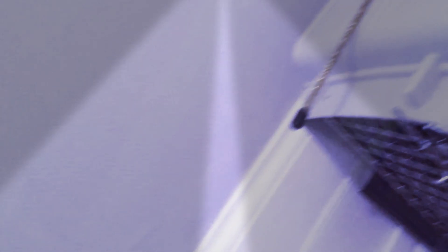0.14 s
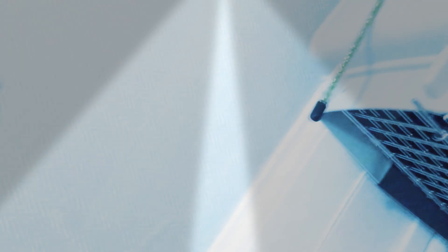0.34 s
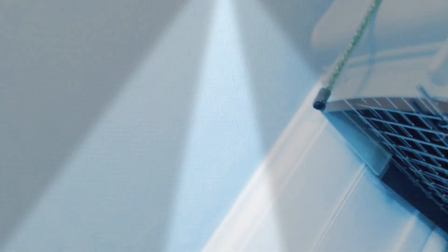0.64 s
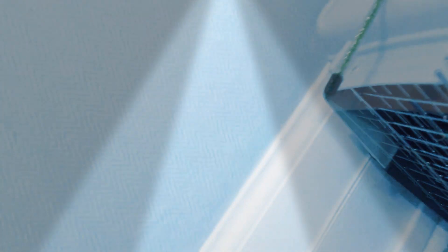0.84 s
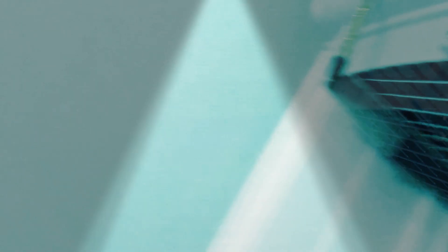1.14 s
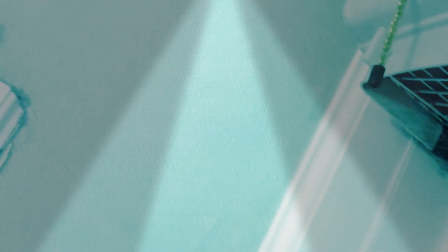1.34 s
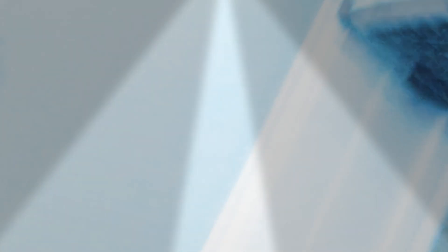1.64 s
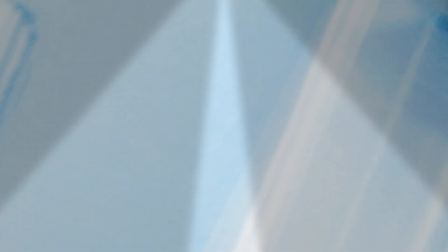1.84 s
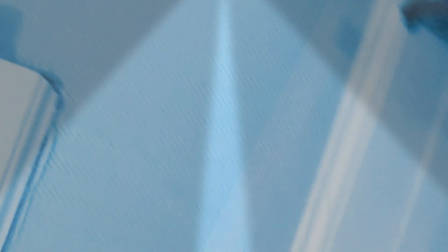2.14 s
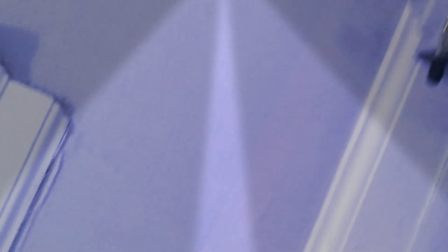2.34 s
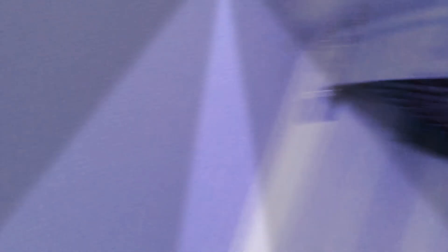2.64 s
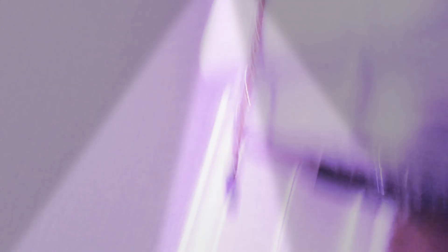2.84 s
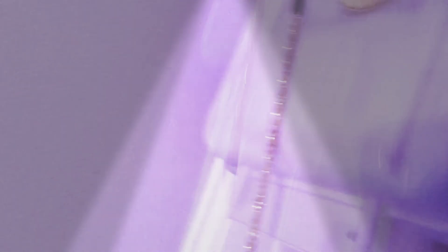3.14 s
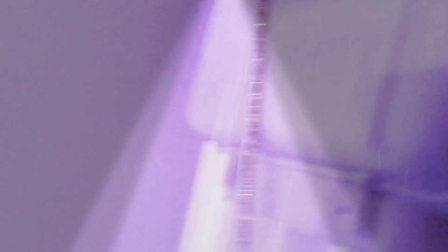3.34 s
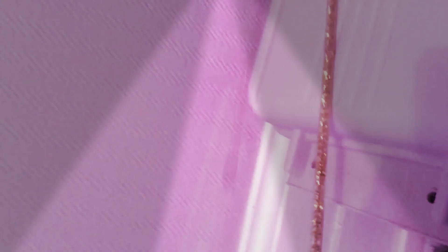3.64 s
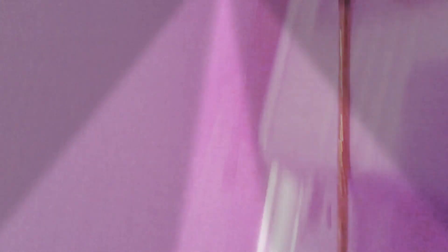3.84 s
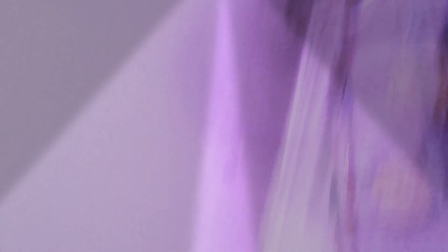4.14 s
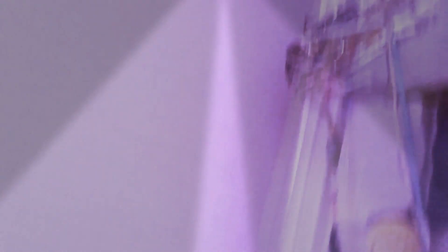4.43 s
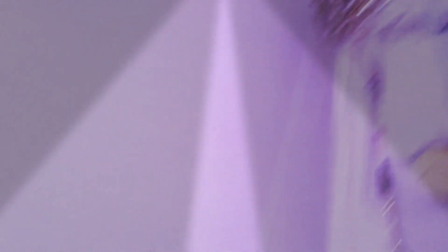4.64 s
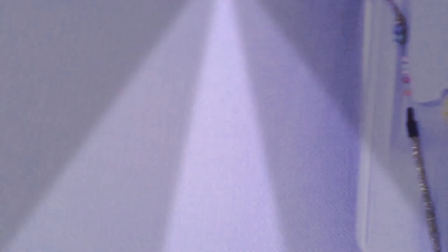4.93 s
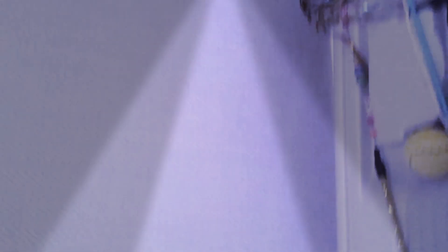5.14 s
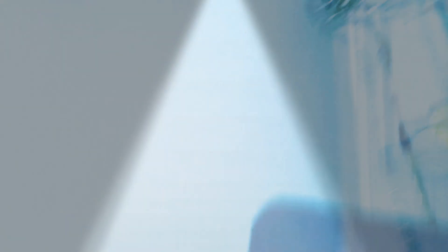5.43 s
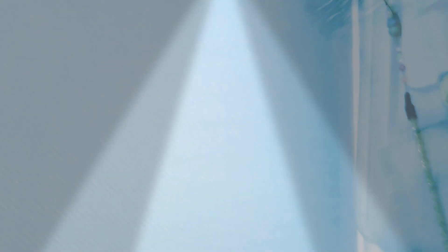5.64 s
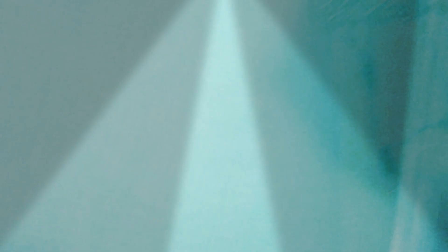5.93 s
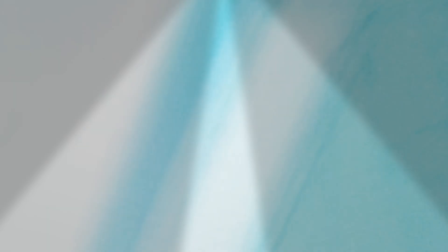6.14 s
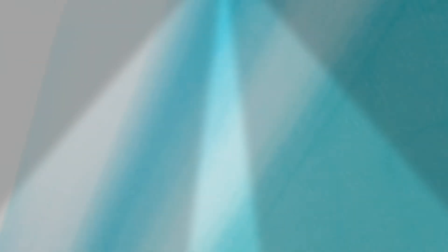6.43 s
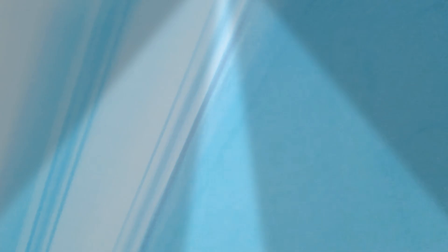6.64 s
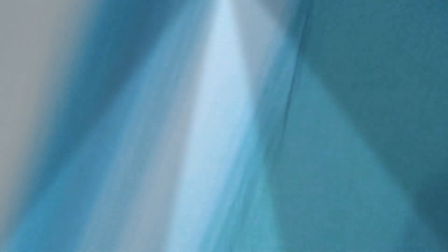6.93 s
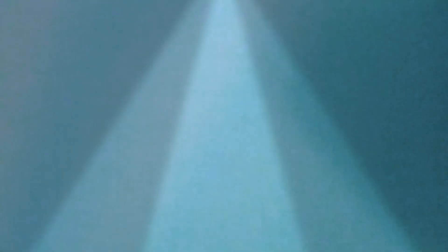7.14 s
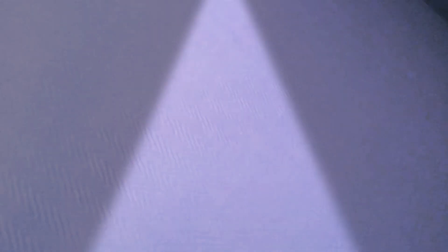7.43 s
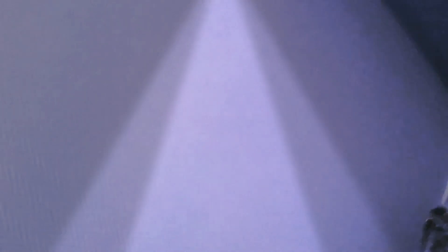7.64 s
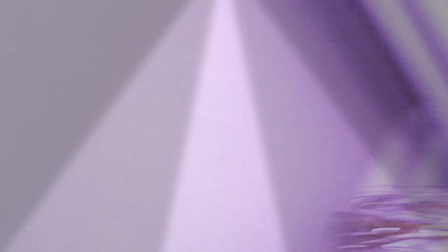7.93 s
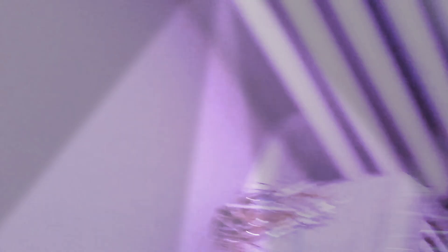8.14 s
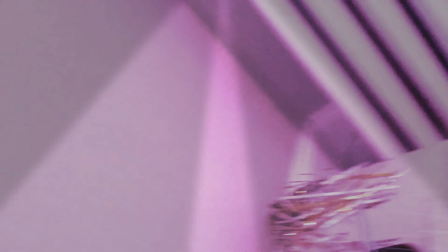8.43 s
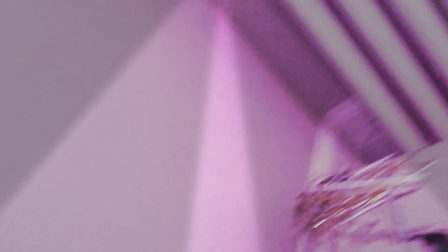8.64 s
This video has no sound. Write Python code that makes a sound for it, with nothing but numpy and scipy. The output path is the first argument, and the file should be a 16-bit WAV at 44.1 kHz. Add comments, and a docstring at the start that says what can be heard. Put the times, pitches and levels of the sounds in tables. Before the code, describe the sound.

Soft hollow knocks and ticks on plastic come close by, amid the scratching and rustling of a small animal moving about.

```python
"""A bare room, hand-held microphone close to some hard plastic things with something light moving among them.
Hollow knocks ring the modes of the plastic and the room answers; small edges tick. Sliding surfaces
rustle, scratch and now and then squeak, with a faint high tone and a fine crackle early on.
Soft bumps reach the microphone through its case, over a low room rumble and a thin hiss."""
import sys
import numpy as np
from scipy import signal
from scipy.fft import rfft, irfft, next_fast_len
from scipy.io import wavfile
from scipy.ndimage import uniform_filter1d, map_coordinates

SR = 44100
rng = np.random.default_rng(int(sys.argv[2]) if len(sys.argv) > 2 else 0)


def unload_wav(signal):
    """Save mono or channel-first audio to the path in sys.argv[1] as 16-bit WAV at rate SR, clipped to [-1, 1]."""
    wavfile.write(
        sys.argv[1],
        SR,
        np.round(np.clip(np.atleast_2d(signal).T, -1, 1) * 32767).astype(np.int16),
    )


N = 386757

# Noise spectra of the background, the room wash and the sliding surfaces: frequency_hz, level_db
RUMBLE_SPECTRUM = [(13, -60), (22, -26), (54, 6), (87, -0.5), (126, -5), (177, -10.5), (400, -23),
                   (520, -106), (880, -120)]
HISS_SPECTRUM = [(150, -42), (250, -4.5), (373, -15), (407, -31), (640, -41), (1100, -35), (7060, -24.5),
                 (8400, -20.5), (14200, -32.5), (16000, -45)]
WASH_SPECTRUM = [(120, -34), (200, -6), (329, 3), (445, 4), (545, -2), (863, -10), (1800, -14), (2340, -43),
                 (3960, -120)]
SCRAPE_SPECTRUM = [(710, -6.5), (1200, -13.5), (1630, -8.5), (1880, -7.5), (2340, -0.5), (2740, -2.5),
                   (2960, -6.5), (5000, -16.5), (6500, -16), (11000, -120)]
SWISH_SPECTRUM = [(2470, -3), (4200, -1), (4830, -23), (5490, 0.5), (6540, -3.5), (7190, -1.5),
                  (8170, -1.5), (9140, 0.5), (10800, -10), (15100, -35), (16000, -4)]
# Decay of the bare room: frequency_hz, t60_s
ROOM_DECAY = [(120, 0.66), (400, 0.33), (1000, 0.72), (3000, 0.49), (8000, 0.34)]
# Bumps through the microphone case: start_s, peak_db, pitch_hz
CASE_BUMPS = [(2, -44, 117), (3.486, -49, 115), (4.097, -53, 178), (4.639, -44.5, 151), (5.051, -44, 118),
              (5.905, -50, 72), (6.202, -42, 112), (7.067, -42, 131), (7.354, -43, 69.6), (7.461, -42, 154),
              (7.497, -38, 55.6), (7.53, -42, 55), (8.424, -30.5, 98), (8.608, -34, 107)]
# Course of the fine crackle: time_s, level_db
CRACKLE_LEVELS = [(0.3, -90), (0.45, -84), (1.4, -69), (1.78, -70), (1.95, -90)]
# Course of the faint high tone: time_s, pitch_hz, level_db
WHISTLE_PATH = [(0.002, 5470, -72), (0.144, 5400, -74), (0.22, 5320, -92)]
# Thin unsteady squeaks: start_s, length_s, first_hz, last_hz, level_db, waver_share
SQUEAK_GLIDES = [(1.024, 0.11, 2870, 2960, -65.5, 0.015), (1.13, 0.21, 2600, 2760, -61, 0.0154),
                 (2.878, 0.19, 3160, 2390, -62, 0.025), (5.608, .27, 2686, 2520, -56, 0.017),
                 (8.692, 0.076, 2610, 2530, -56.5, 0.029)]
# Very short clean chirps: start_s, length_s, first_hz, last_hz, level_db
CHIRP_GLIDES = [(1.612, 0.022, 6700, 6750, -61), (4.575, 0.02, 6800, 6850, -59),
                (4.615, 0.026, 9650, 9000, -64), (5.053, 0.035, 6630, 6280, -56.5)]
# Course of the sliding: time_s, scrape_db, swish_db
SLIDE_LEVELS = [(0.0, -73.5, -66.5), (0.3, -72.5, -83), (0.5, -74, -64), (0.85, -60.5, -68.5),
                (1.29, -58, -60.5), (1.83, -62, -61), (2.27, -65.5, -67), (2.39, -78, -95),
                (2.66, -70, -70), (2.86, -59, -60.5), (3.05, -65, -77), (3.3, -62.5, -71), (3.55, -70, -81),
                (4.15, -58.5, -66.5), (4.59, -68, -65.5), (5.03, -58, -59.5), (5.3, -68.5, -72),
                (5.81, -62.5, -68), (6.28, -67, -81), (7.17, -66.5, -72), (7.38, -63, -64),
                (8.2, -71.5, -67.5), (8.32, -67, -75), (8.77, -62.5, -67.5)]
# Single scratching strokes, and one dry snap on the case at 8.421 s: start_s, rise_s, t60_s, level_db,
# centre_hz, width_hz
STROKES = [(0.335, .006, 0.33, -60, 3270, 2000), (0.334, 0.0041, 0.091, -57.5, 8200, 2520),
           (0.448, 0.035, 0.49, -62, 3040, 1500), (1.134, 0.0032, 0.16, -52, 3300, 990),
           (2.708, 0.076, 0.93, -57.5, 5800, 1610), (3.749, 0.016, 0.057, -56.5, 2530, 1200),
           (3.852, 0.014, 0.34, -57.5, 2200, 2500), (4.385, 0.024, 0.74, -53, 2440, 1780),
           (4.55, 0.07, 2.7, -63, 8940, 1600), (4.581, 0.21, 2.4, -63.5, 6300, 1300),
           (5.62, 0.13, 0.45, -68.5, 5970, 1410), (7.201, 0.038, 0.99, -54.5, 2560, 1320),
           (7.723, 0.0044, 0.47, -48, 3030, 2600), (7.712, 0.038, 0.28, -59.5, 8100, 3000),
           (8.421, 0.0018, 0.0091, -39.5, 724, 2220), (8.501, 0.0035, 0.62, -58, 4930, 6240)]
# Small edges touching: start_s, peak_db, pitch_hz, treble_db (against the mode at pitch_hz)
EDGE_TICKS = [(0.317, -48, 2800, -3), (0.3691, -42, 3030, 10), (0.462, -44, 2480, 2),
              (0.4817, -58, 3340, 0), (0.508, -42.5, 3040, -7), (0.529, -46, 2800, -7),
              (0.547, -41, 2900, -1), (0.598, -46, 2670, 1), (0.755, -52, 2700, -9), (1.022, -43, 2660, -6),
              (1.1355, -33, 3480, -11), (1.165, -44, 2780, -19), (1.499, -39, 1900, -26),
              (1.553, -59, 3500, 6), (1.759, -45.5, 3480, 1), (1.851, -45, 3750, -1),
              (2.0927, -40, 3540, -1), (2.1797, -35, 2420, 3), (3.658, -46.5, 2500, -2.5),
              (3.847, -47, 2280, -18), (3.863, -35, 1560, -15), (3.882, -41, 2130, -7),
              (3.918, -40.5, 1610, -17), (3.966, -52, 2120, -23), (3.98, -47.5, 2250, 5),
              (4.929, -45, 3600, -8), (5.264, -49, 2700, -8.5), (5.285, -48, 2170, -20),
              (5.414, -49, 2500, -30), (6.1156, -48, 2440, -10), (6.797, -46, 2400, -11),
              (6.955, -56, 2360, -19.5), (7.08, -49, 3330, -3), (7.297, -42, 2900, -12),
              (7.547, -52, 2500, 2), (7.705, -44, 2920, -12), (7.723, -38, 2870, -16),
              (8.188, -49, 6600, 8), (8.4, -48, 2350, 0), (8.4935, -33.5, 2350, 2.5),
              (8.5013, -28, 3310, 4)]
# Hollow modes of the plastic in three groups, deep, middle and upper: frequency_hz, width_hz, level_db
HOLLOW_MODES = [
    [(334, 60, -1), (409.7, 33, 0)],
    [(550, 55, 1.5), (626.5, 33, -1.5), (711, 70, -1)],
    [(900.6, 82, 2.5), (1243, 237, -3)],
]
# Stiff modes and thin-edge modes of the plastic: frequency_hz, width_hz, level_db
STIFF_MODES = [(1370, 130, 8), (1610, 120, 1), (1924, 120, 4.5), (2270, 140, 4), (2553, 143, 4.5),
               (3030, 210, 4.5), (3820, 440, -3.5)]
THIN_EDGE_MODES = [(5400, 4400, 10.5), (7870, 940, 3), (9100, 3500, 11), (15500, 1300, -17)]
# Low modes of a thud: pitch_multiple, width_hz, level_db
THUD_MODES = [(1, 34, 4), (1.5, 47, -10)]
# Blows on the plastic: start_s, level_db (peak of the deep modes; the other levels are relative to it),
# thud_db, middle_db, hardness_db, snap_db, room_db, thud_hz, stiff_hz (where stiff modes are favoured)
BLOWS = [(0.28, -44, -10, -18, -20.5, -19.5, -6.5, 192, 2840),
         (0.66, -51, -19, -2.5, -41, -36, -3, 178, 2240),
         (0.734, -41.5, -14, -16.5, -13.5, -20.5, -2.5, 181, 2110),
         (1.34, -40, 2.5, -9, -8.5, -19, -2, 137, 3100),
         (1.471, -33, -6.5, -5, -10, -20.5, -5.5, 178, 2300),
         (2.046, -45.5, 4.5, -16, -19, -27, 3, 116.5, 2790),
         (2.11, -32.5, -20, -12, -10, -24, -5, 244, 2260),
         (2.679, -39, -10.5, -14.5, -9.5, -20.5, -5, 167, 1940),
         (3.222, -54, 0.5, -6, -8, -19, -12, 115, 2360), (3.8, -65, -4, 9, 0, -26, -5, 151, 1090),
         (3.848, -43, -14, -17, -13, -28, 2.5, 110, 1620), (3.9, -52.5, -28, -18, 3.5, -27, -14, 150, 1770),
         (4.339, -55, -24, -7, -12, -28, -19, 150, 2010), (4.842, -56, -21, -15, -9, -27, 6, 150, 1920),
         (4.928, -34, -15.5, -15, -12.5, -25, 1, 132, 2000),
         (5.253, -46, 5, -12.5, -16, -21.5, -2, 180.5, 2270),
         (5.949, -54.5, -2.5, -5.5, -6.5, -26, 2, 102, 1700),
         (6.53, -25, -16.5, -10.5, -4.5, -24.5, -1.5, 150, 3020),
         (6.704, -35, -9, -15, -19.5, -25, -5, 252, 2300), (7.137, -49, -9, -16, -8, -22, 2.5, 185, 2060),
         (7.6, -53, -1, -7, -9.5, -29, -2, 91.5, 2050), (8.132, -53.5, -1, -18, -15.5, -15, -3, 94, 2390)]


def amp(db):
    """Gain of a level in dB."""
    return 10 ** (np.asarray(db) / 20)


def unit(x):
    """x at rms 1."""
    return x / np.sqrt(np.mean(x ** 2) + 1e-20)


def unit_attack(x):
    """x at rms 1 over its first 15 ms."""
    return x / np.sqrt(np.mean(x[:SR * 15 // 1000] ** 2))


def along(points, hz):
    """Reads (frequency_hz, value) points at hz, on a log frequency axis."""
    point_hz, values = np.transpose(points)
    return np.interp(np.log(hz + 1), np.log(point_hz + 1), values)


def curves(rows):
    """One value per sample for each column after time_s."""
    time_s, *columns = np.transpose(rows)
    return [np.interp(np.arange(N) / SR, time_s, column) for column in columns]


def wobble(rate_hz):
    """A smooth random curve with rate_hz knots a second."""
    knots = rng.standard_normal(int(N * rate_hz / SR) + 4)
    return map_coordinates(knots, [np.arange(N) * rate_hz / SR])


def add(track, start_s, sound):
    """Mixes a sound in at start_s."""
    part = track[round(start_s * SR):][:len(sound)]
    part += sound[:len(part)]


def filtered(x, response):
    """x through a complex frequency response."""
    size = next_fast_len(len(x) + SR // 4)
    return irfft(rfft(x, size) * response(np.fft.rfftfreq(size, 1 / SR)), size)[:len(x)]


def resonance(hz, centre_hz, width_hz):
    """Band-pass response of one damped mode."""
    return 1j * hz * width_hz / (centre_hz ** 2 - hz ** 2 + 1j * hz * width_hz)


def rush(spectrum, patchy_db, grain_db):
    """Gritty noise of rms 1, with louder and softer patches across time and frequency."""
    grit = rng.standard_normal(N) * amp(grain_db * wobble(400))
    frames = signal.stft(grit, nperseg=512)[2]
    patches = uniform_filter1d(rng.standard_normal(frames.shape), 6, axis=0)
    patches = uniform_filter1d(patches, 10, axis=1)
    patched = signal.istft(frames * amp(patchy_db * unit(patches)), nperseg=512)[1][:N]
    return unit(filtered(patched, lambda hz: amp(along(spectrum, hz))))


def tone(path, flutter_db, waver):
    """A sine along (time_s, pitch_hz, level_db) rows; its level flutters and its pitch wavers."""
    time_s, hz, db = np.transpose(path)
    t = np.arange(time_s[0], time_s[-1], 1 / SR)
    shake = lambda rate_hz: map_coordinates(rng.standard_normal(rate_hz), [(t - t[0]) * rate_hz])
    gate = np.clip(np.minimum(t - t[0], time_s[-1] - t) / 0.0057, 0, 1)
    pitch_hz = np.interp(t, time_s, hz) * (1 + waver * shake(300))
    level_db = np.interp(t, time_s, db) + flutter_db * shake(90)
    return np.sqrt(2) * gate * amp(level_db) * np.sin(2 * np.pi * np.cumsum(pitch_hz) / SR)


def ring(modes, t, contact_s, rise_s, rattle=0.15):
    """Damped modes of alternating sign, struck once and then rattled by the contact; peak 1."""
    ringing = np.zeros(len(t))
    for k, (hz, width_hz, db) in enumerate(modes):
        strength = (-1) ** k * amp(db + rng.normal(0, 1.5))
        ringing += strength * np.exp(-np.pi * width_hz * t) * np.sin(2 * np.pi * hz * t)
    force = (t == 0) + rattle * rng.standard_normal(len(t)) * np.exp(-t / contact_s)
    sound = signal.fftconvolve(ringing * (1 - np.exp(-t / rise_s)), force)[:len(t)]
    return sound / np.abs(sound).max()


def room(x):
    """The room answers 8 ms late with a noise tail in which each frequency dies at its own speed."""
    hz, t, frames = signal.stft(rng.standard_normal(SR * 3 // 5), SR, nperseg=256)
    decay = amp(-60 * t / along(ROOM_DECAY, hz)[:, None])
    tail = signal.istft(frames * decay, SR, nperseg=256)[1]
    return signal.fftconvolve(np.pad(x, (350, 0)), tail / np.linalg.norm(tail))


def room_tone():
    """A lumpy, slowly swaying rumble and a steady hiss lie behind everything."""
    lumps_db = 1.8 * wobble(14)
    sway_db = -1.5 * wobble(1.36)
    rumble = amp(-57 + sway_db + lumps_db) * rush(RUMBLE_SPECTRUM, patchy_db=2.5, grain_db=-3.0)
    hiss = amp(-74) * rush(HISS_SPECTRUM, patchy_db=4.5, grain_db=-1.0)
    return rumble + hiss


def handling_bumps():
    """The microphone case swings once or twice; a slower swing starts softer and lasts longer."""
    out, t = np.zeros(N), np.arange(SR // 8) / SR
    for start_s, peak_db, hz in CASE_BUMPS:
        cycles = t * hz
        swell = np.exp(-cycles / 0.77) * (1 - np.exp(-cycles / 0.083))
        add(out, start_s, amp(peak_db) * np.sin(2 * np.pi * cycles) * swell / swell.max())
    return out


def crackle(clicks_per_s=2800, spread_db=3.2):
    """Dense tiny clicks of uneven size ring one broad, very high resonance."""
    level_db, = curves(CRACKLE_LEVELS)
    chance, size = rng.random((2, N))
    strength = amp(-spread_db * np.log(size + 1e-4))
    clicks = (chance < clicks_per_s / SR) * strength * rng.choice([-1, 1], N)
    band = filtered(clicks, lambda hz: resonance(hz, centre_hz=12700, width_hz=7500) ** 2)
    return amp(level_db) * unit(band)


def squeaks(peak_share=0.6, swell_db=9.5):
    """Sliding surfaces give raspy squeaks and clean chirps that glide evenly as they swell and fade."""
    out = np.zeros(N)
    chirps = [(*row, 0.004) for row in CHIRP_GLIDES]  # hardly any waver
    for start_s, length_s, first_hz, last_hz, db, waver in SQUEAK_GLIDES + chirps:
        glide = [(start_s, first_hz, db - swell_db),
                 (start_s + peak_share * length_s, first_hz + peak_share * (last_hz - first_hz), db),
                 (start_s + length_s, last_hz, db - swell_db)]
        add(out, start_s, tone(glide, flutter_db=3.5, waver=waver))
    return out


def whistle():
    """One faint, clean high tone sinks a little and fades."""
    out = np.zeros(N)
    add(out, WHISTLE_PATH[0][0], tone(WHISTLE_PATH, flutter_db=1.0, waver=0.002))
    return out


def wash_and_rustle(tail_db=-19, rise_s=0.018, t60_s=0.89):
    """Surfaces slide with a scrape and a high swish over a hollow room wash, all wavering together."""
    wash_gain, t = np.full(N, amp(-76.5)), np.arange(SR) / SR
    tail = amp(tail_db - 60 * t / t60_s) * (1 - np.exp(-(t / rise_s) ** 2))
    for start_s, level_db, *_ in BLOWS:  # room reverberation lingers after each knock
        add(wash_gain, start_s, amp(level_db) * tail)
    modes, bypass = sum(HOLLOW_MODES, []), 0.25
    hollow = lambda hz: bypass + sum(resonance(hz, centre, width) for centre, width, _ in modes)
    jolt = wobble(30)
    low_noise = rush(WASH_SPECTRUM, patchy_db=3.5, grain_db=-3.0)
    wash = wash_gain * amp(2.6 * jolt) * unit(filtered(low_noise, hollow))
    scrape_db, swish_db = curves(SLIDE_LEVELS)
    scrape = amp(scrape_db + 1.3 * jolt) * rush(SCRAPE_SPECTRUM, patchy_db=2.6, grain_db=1.6)
    swish = amp(swish_db + 1.5 * jolt) * rush(SWISH_SPECTRUM, patchy_db=2.8, grain_db=3.2)
    return wash + scrape + swish


def scratches():
    """Gritty noise in one steep resonance swells and fades with each stroke."""
    out, t = np.zeros(N), np.arange(2 * SR) / SR
    for start_s, rise_s, t60_s, level_db, centre_hz, width_hz in STROKES:
        noise = rng.standard_normal(len(t))
        grain_db = 0.73 * np.repeat(rng.standard_normal(len(t) // 100), 100)
        band = unit(filtered(noise * amp(grain_db), lambda hz: resonance(hz, centre_hz, width_hz) ** 2))
        swell = np.sin(np.pi / 2 * np.minimum(t / rise_s, 1))
        fade = amp(-60 * np.maximum(t - rise_s, 0) / t60_s)
        add(out, start_s, amp(level_db) * swell * fade * band)
    return out


def ticks(room_db=-6):
    """Short contacts close by ring two broad modes and the thin edges for a few milliseconds."""
    out, t = np.zeros(N), np.arange(SR // 40) / SR
    for start_s, peak_db, pitch_hz, treble_db in EDGE_TICKS:
        modes = [(pitch_hz, 500, 0), (1.21 * pitch_hz, 700, -5)]
        modes += [(hz, width, db + treble_db) for hz, width, db in THIN_EDGE_MODES]
        tick = amp(peak_db) * ring(modes, t, contact_s=0.0055, rise_s=0.00018, rattle=0.12)
        add(out, start_s, tick)
        add(out, start_s, amp(room_db) * room(tick))
    return out


def knocks(octave_loss_db=16, far_width_ratio=0.93, far_db=-2.5):
    """Blows near the microphone ring the plastic, brighter when they are hard, and the room answers."""
    out, t = np.zeros(N), np.arange(SR // 8) / SR
    deep, middle, upper = HOLLOW_MODES
    strike = lambda modes, **contact: unit_attack(ring(modes, t, **contact))
    for start_s, level_db, thud_db, middle_db, hardness_db, snap_db, room_db, thud_hz, stiff_hz in BLOWS:
        thud = [(multiple * thud_hz, width, db) for multiple, width, db in THUD_MODES]
        stiff = [(hz, width, db - octave_loss_db * np.log2(hz / stiff_hz) ** 2)
                 for hz, width, db in STIFF_MODES]
        upper_db = -13.5 + 0.74 * hardness_db - 0.5 * middle_db  # loses as the middle modes gain
        body = ring(deep, t, contact_s=0.0046, rise_s=0.00035)
        body += amp(middle_db) * strike(middle, contact_s=0.000097, rise_s=0.0003)
        body += amp(upper_db) * strike(upper, contact_s=0.008, rise_s=0.001)
        body += amp(thud_db) * strike(thud, contact_s=0.0016, rise_s=0.0011)
        body += amp(snap_db) * strike(THIN_EDGE_MODES, contact_s=0.0056, rise_s=0.00004)
        near = strike(stiff, contact_s=0.0031, rise_s=0.000099)
        # From across the room the stiff modes start softer and rattle less.
        stiff_far = [(hz, far_width_ratio * width, db) for hz, width, db in stiff]
        far = strike(stiff_far, contact_s=0.0017, rise_s=0.00075, rattle=0.047)
        add(out, start_s, amp(level_db) * (body + amp(hardness_db) * near))
        add(out, start_s, amp(level_db + room_db) * room(body + amp(hardness_db + far_db) * far))
    return out


def scene():
    """Everything that reaches the microphone, in mono."""
    foreground = knocks() + ticks() + scratches() + handling_bumps() + wash_and_rustle() + squeaks()
    return (foreground + whistle() + crackle() + room_tone())[None]


def record(dry):
    """The sound loses the deepest bass and the very top, with two narrow treble dips."""
    def response(hz, bass_hz=45, top_hz=15850):
        dip = lambda centre_hz, width_hz, depth: 1 - depth * np.exp(-((hz - centre_hz) / width_hz) ** 2)
        low_cut = (1j * hz / (bass_hz + 1j * hz)) ** 3
        return (hz < top_hz) * low_cut * dip(7200, 220, 0.33) * dip(13400, 320, 0.36)
    return filtered(dry[0], response)[None]


dry = scene()
out = record(dry)
unload_wav(out)
```